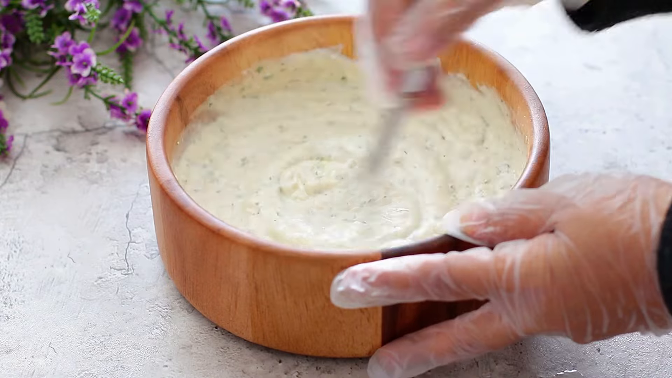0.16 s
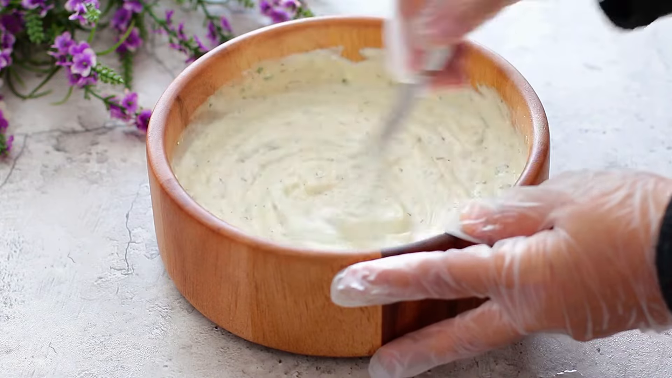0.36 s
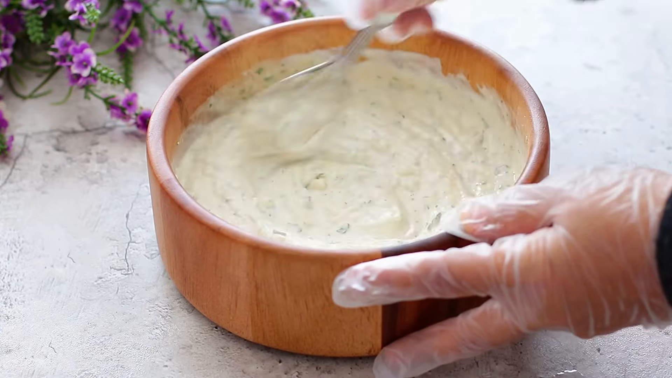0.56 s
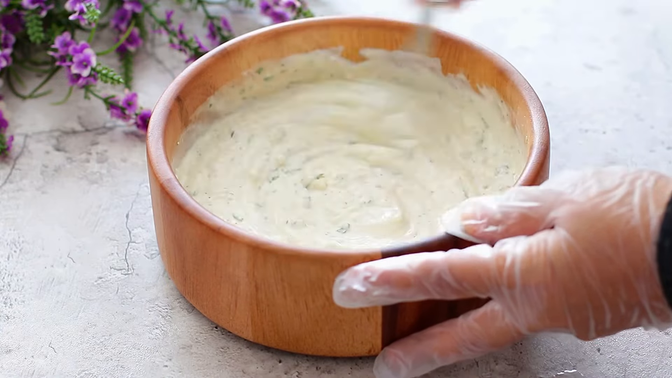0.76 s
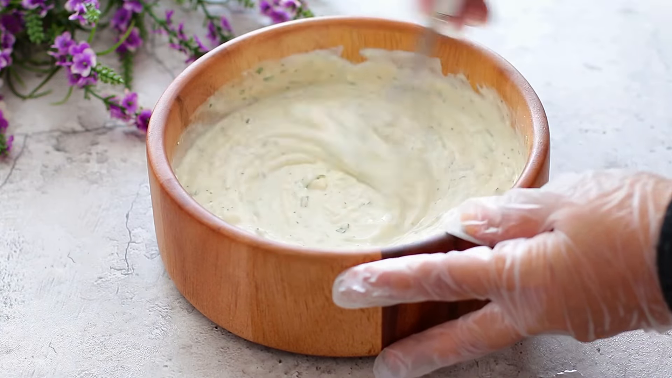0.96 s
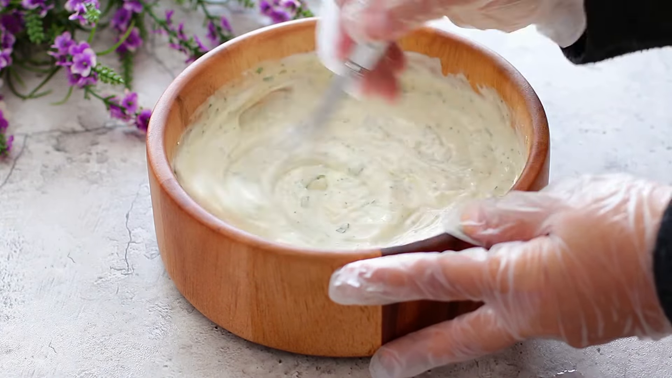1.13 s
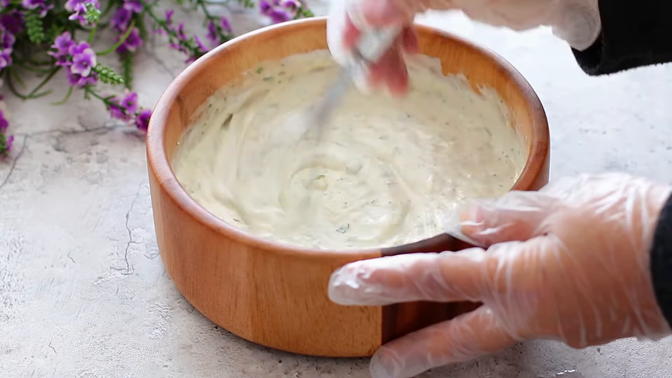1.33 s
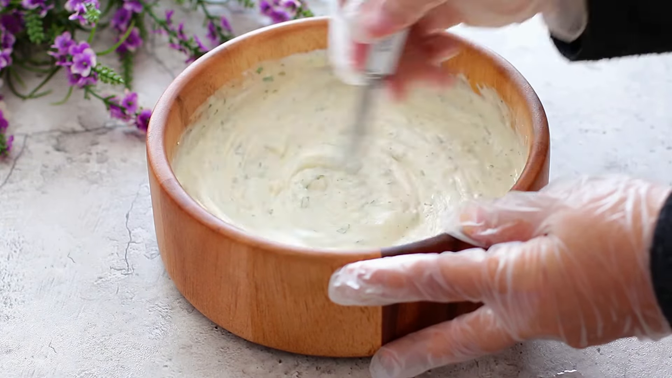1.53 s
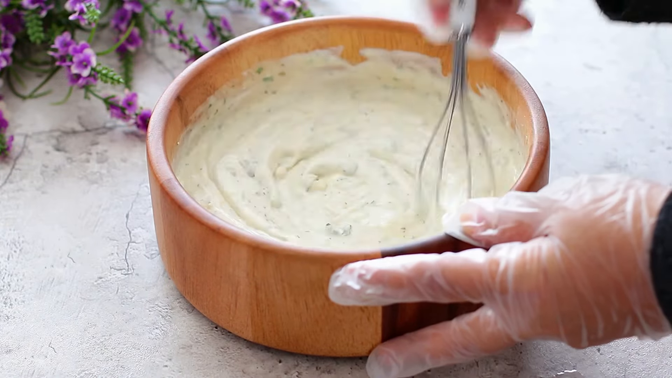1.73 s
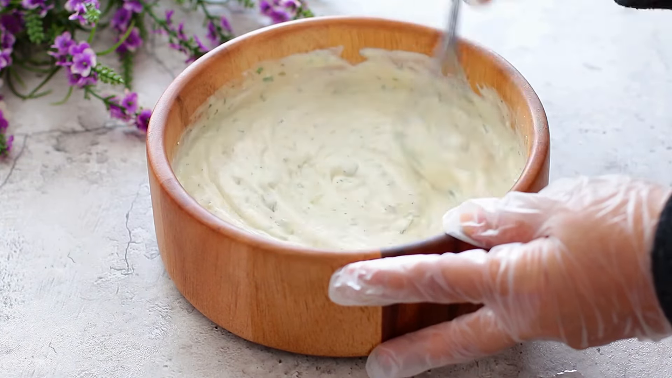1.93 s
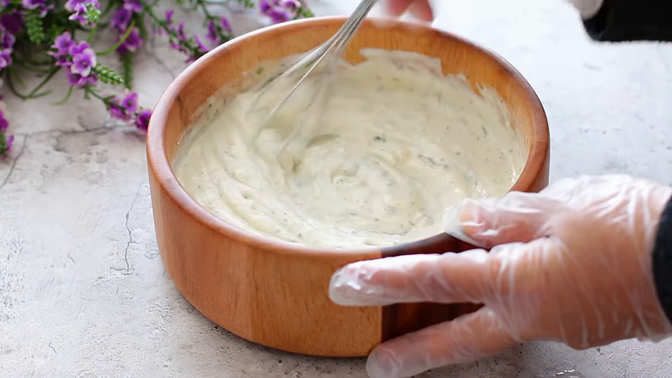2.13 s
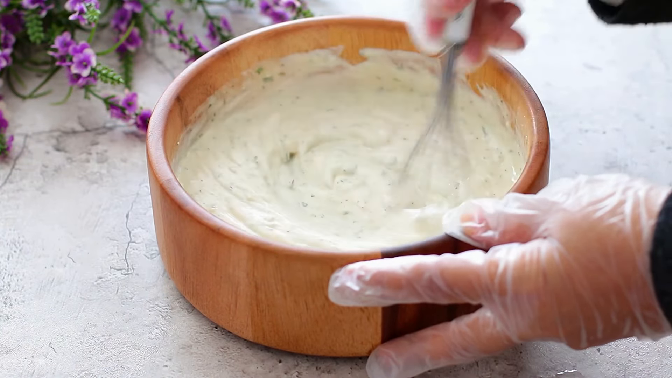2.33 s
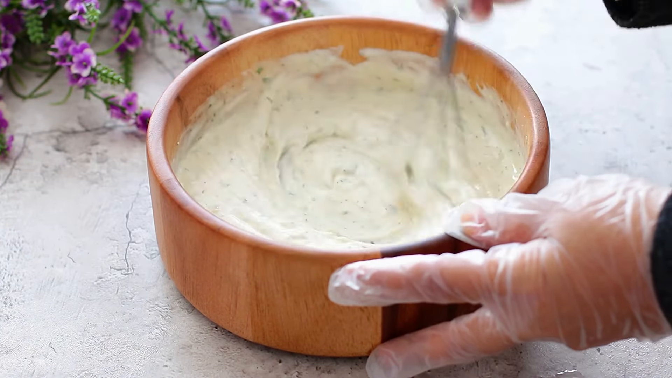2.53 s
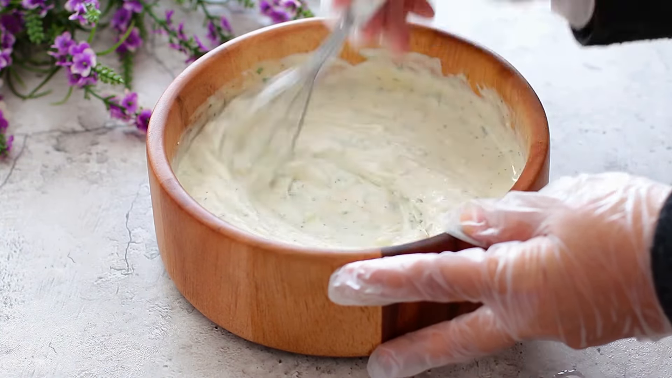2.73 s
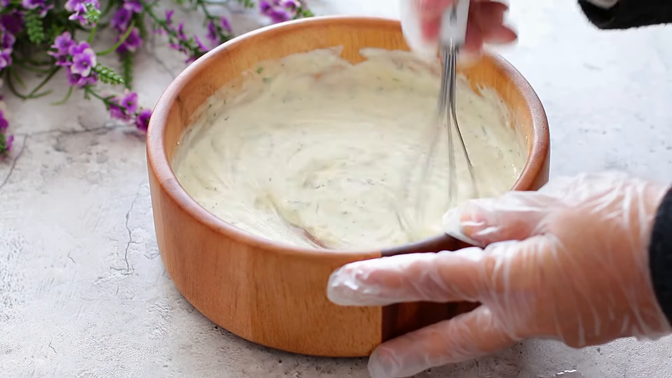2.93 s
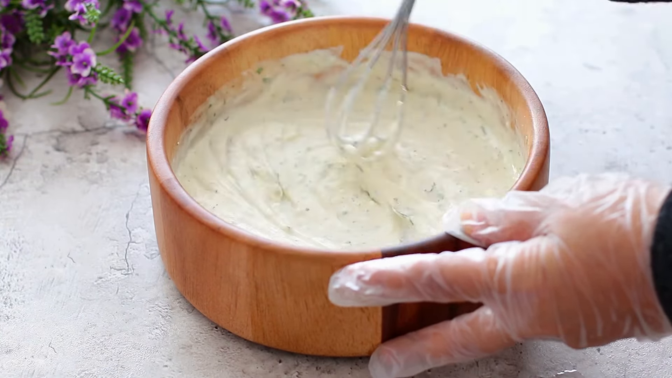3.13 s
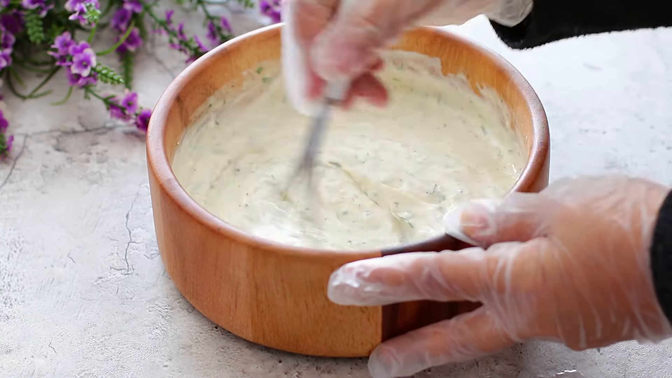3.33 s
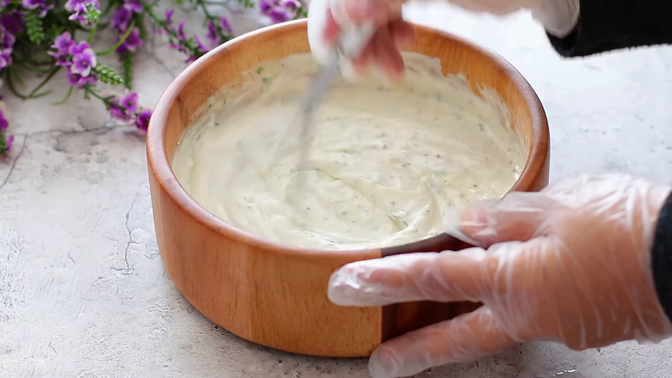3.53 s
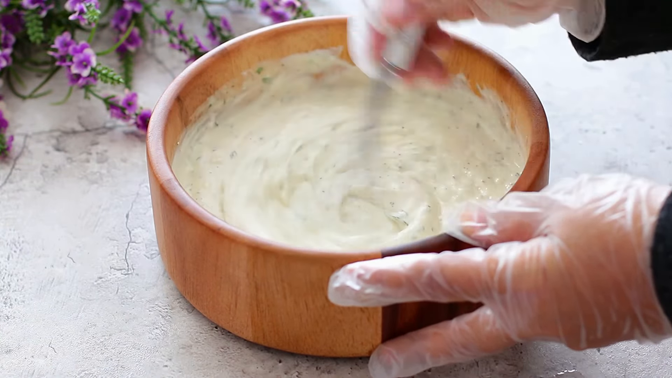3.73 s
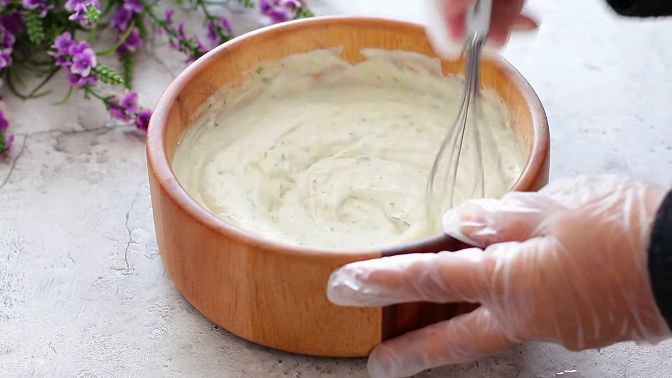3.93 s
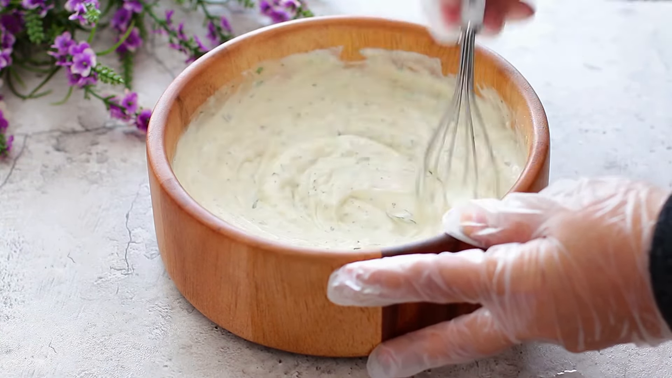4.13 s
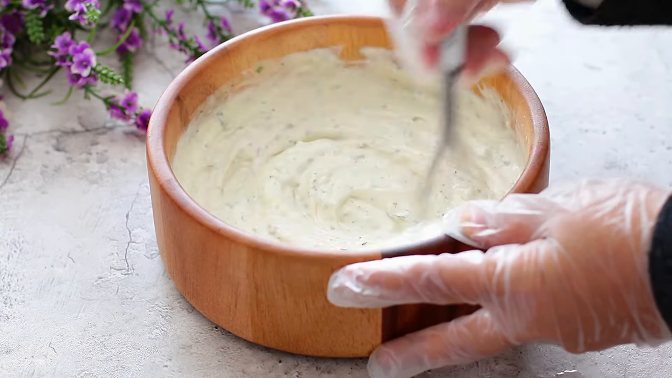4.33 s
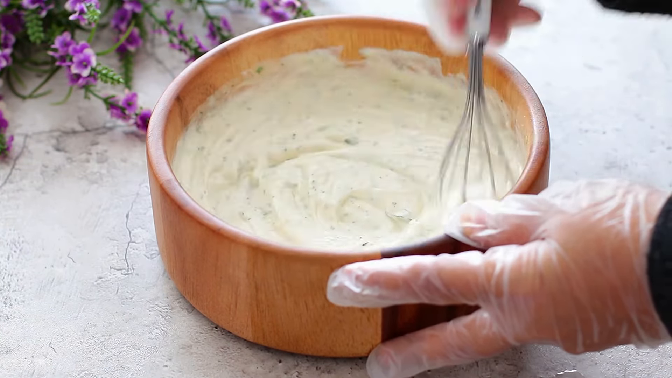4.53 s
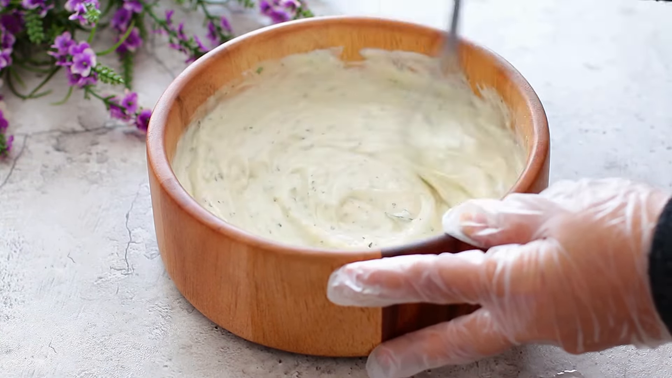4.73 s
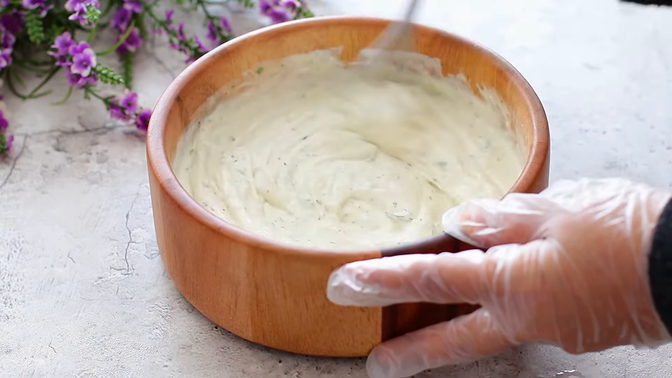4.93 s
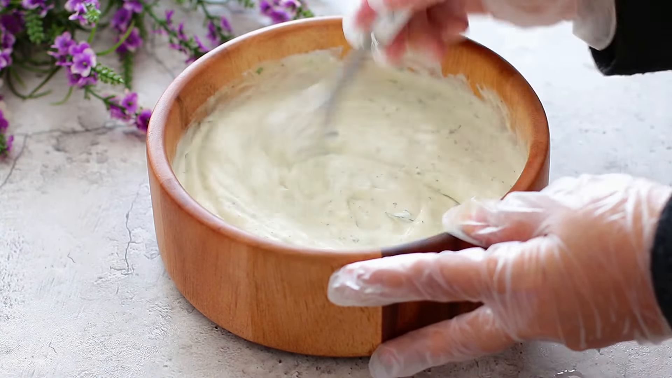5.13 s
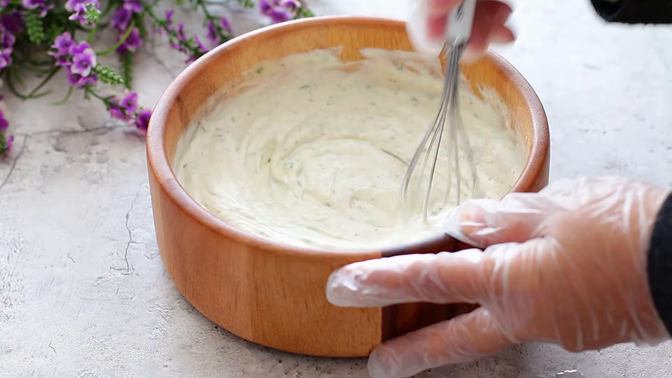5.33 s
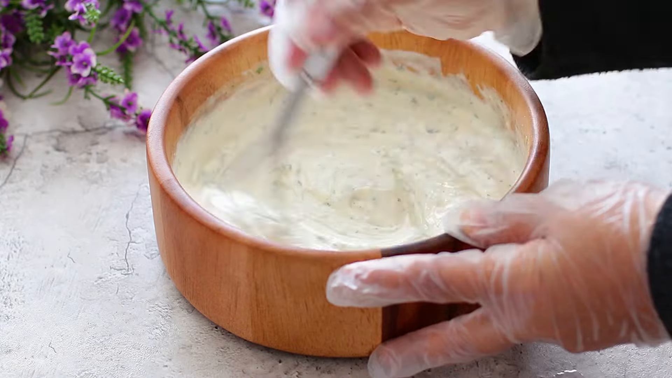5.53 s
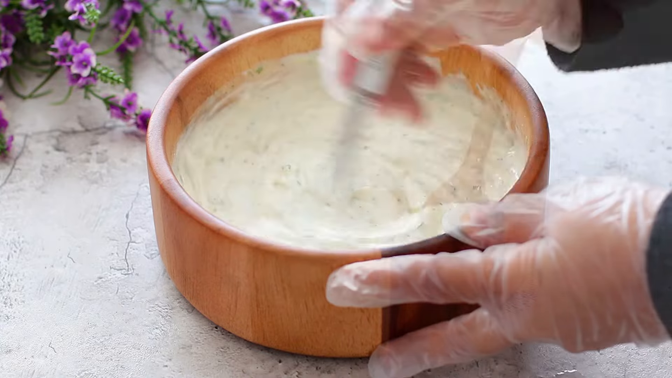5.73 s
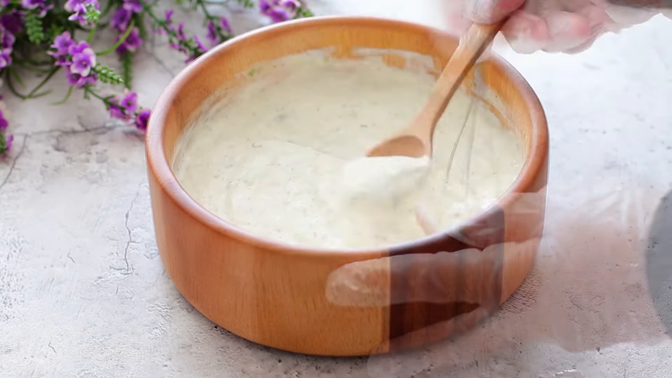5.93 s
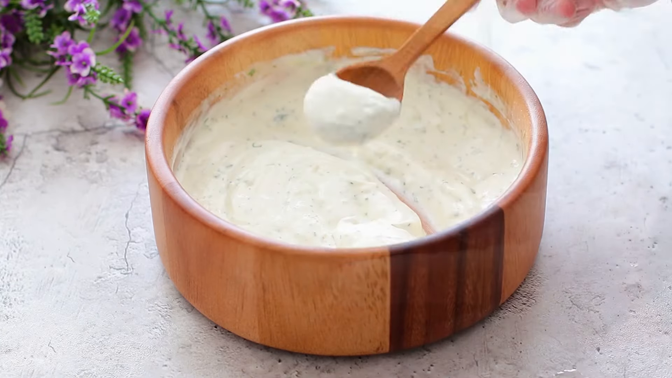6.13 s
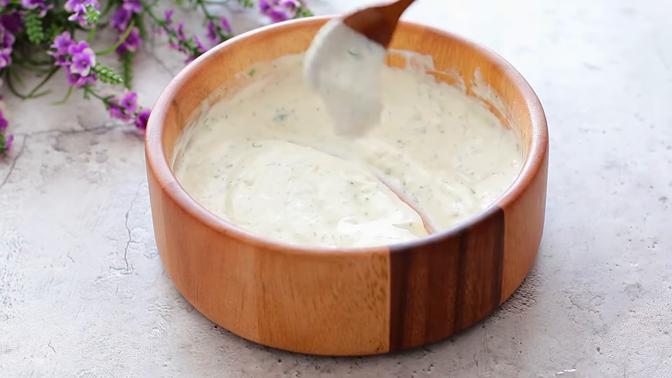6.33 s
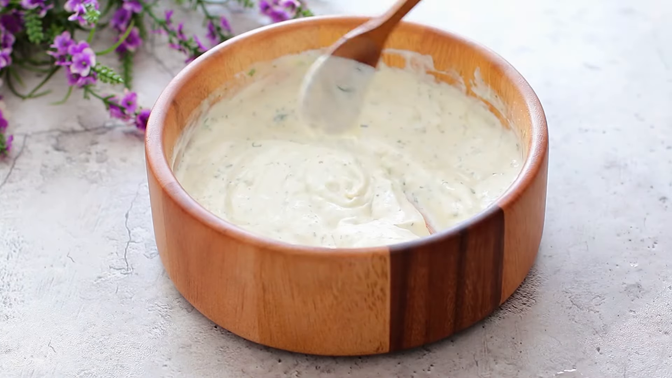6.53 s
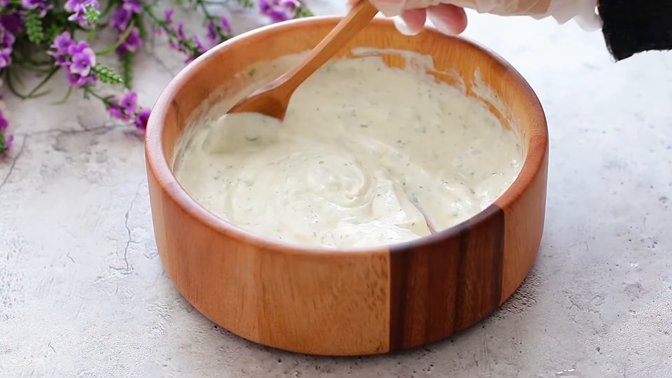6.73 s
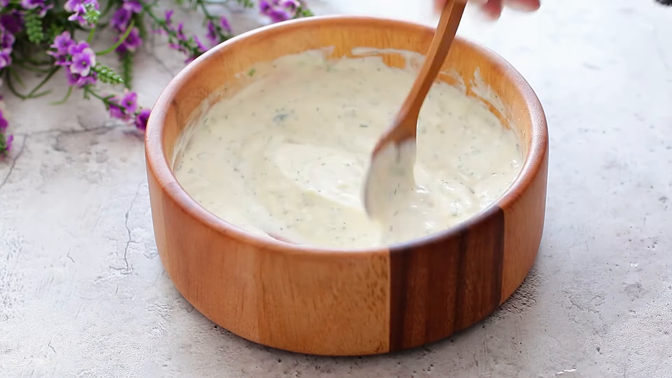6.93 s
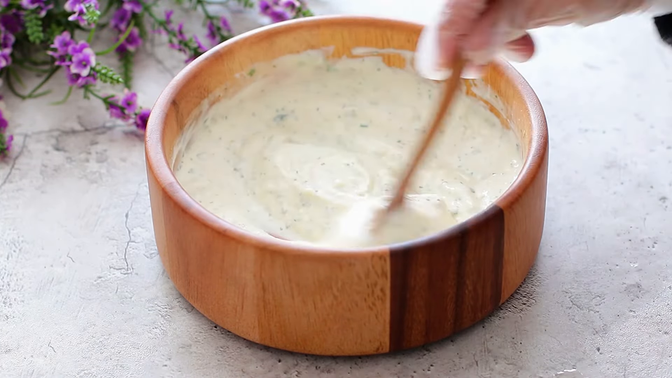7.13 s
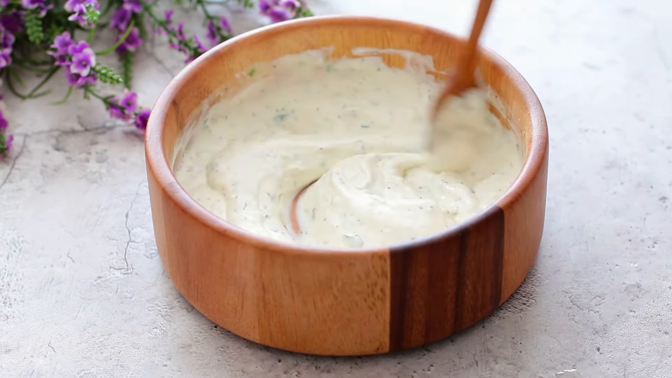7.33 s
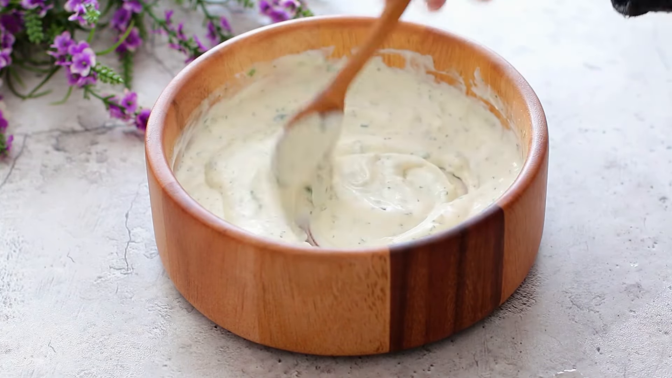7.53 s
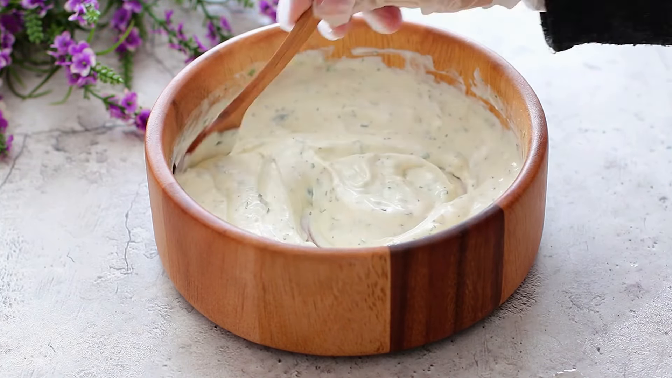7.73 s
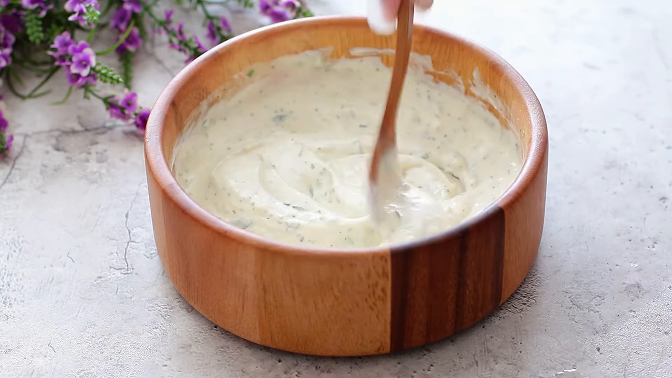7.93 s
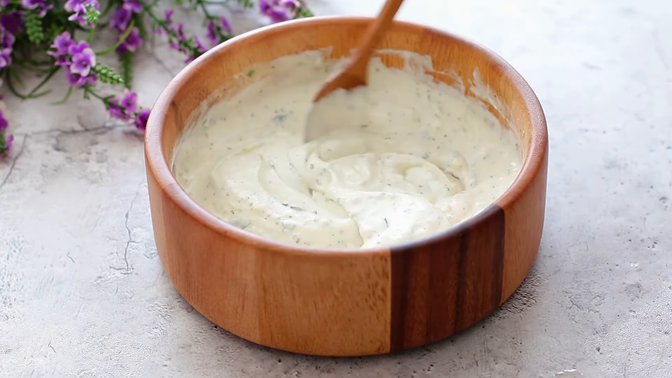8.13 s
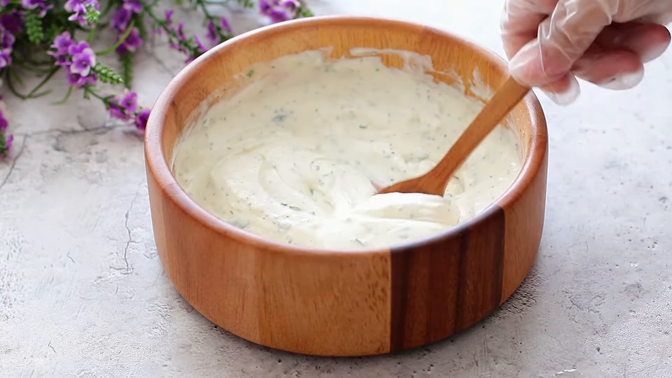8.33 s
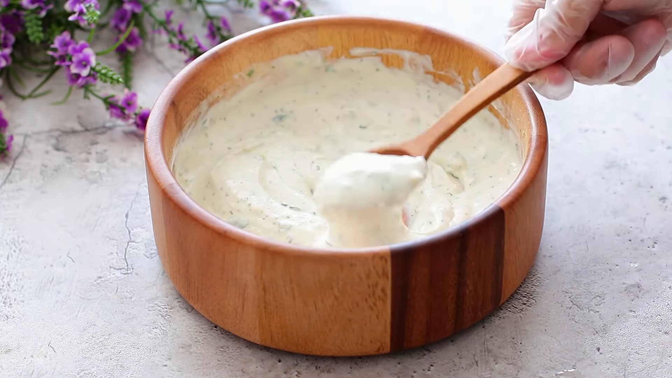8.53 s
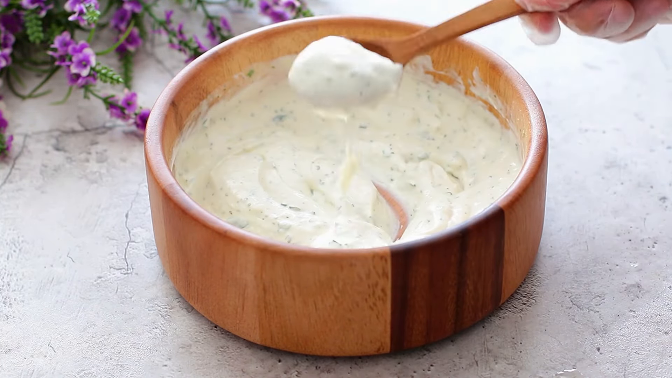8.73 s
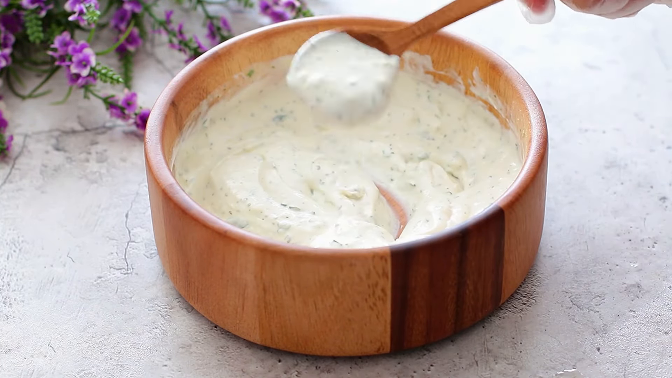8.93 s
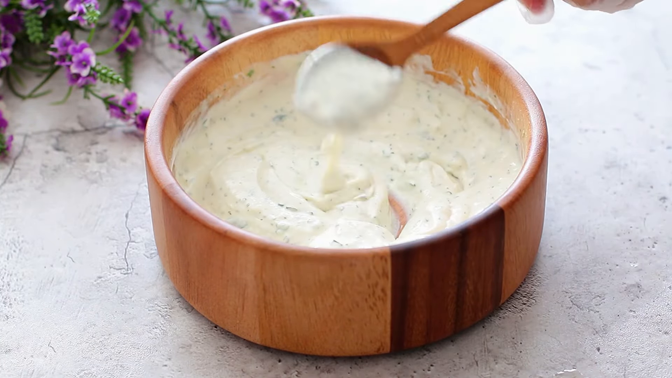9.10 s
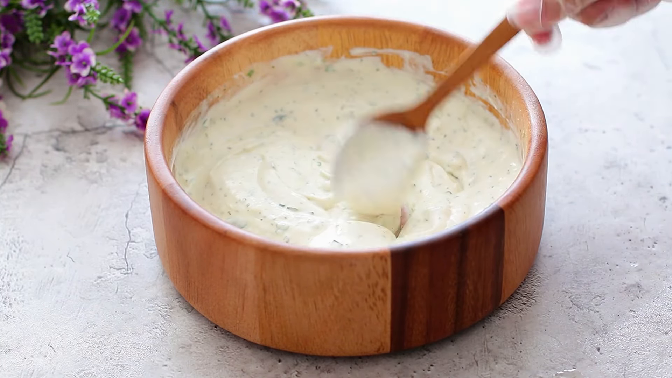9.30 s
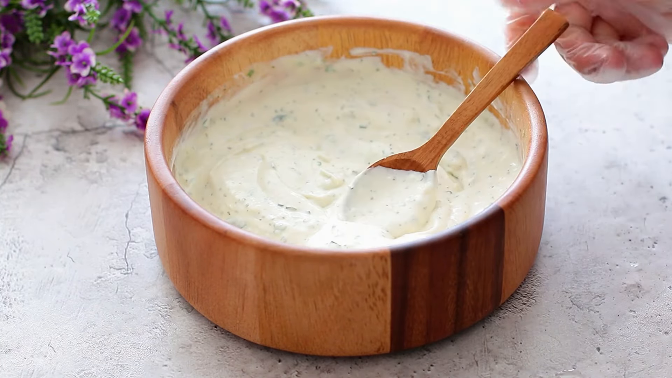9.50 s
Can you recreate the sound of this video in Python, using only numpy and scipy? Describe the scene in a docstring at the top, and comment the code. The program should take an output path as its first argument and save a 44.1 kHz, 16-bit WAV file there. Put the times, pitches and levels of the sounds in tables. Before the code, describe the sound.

Close by in a quiet kitchen, a wire whisk beats thick creamy sauce in a wooden bowl: light wet swishes grow into firm, scratchy strokes, with tiny pauses, bubbles and ticks on the wall. After about six seconds it stops. A wooden spoon stirs softly with dull knocks and short rubs, then a faint double tap lands on the rim over still air.

```python
"""Whisk and spoon in a wooden bowl

A wire whisk beats thick sauce, then a wooden spoon stirs and lifts it, close by in a quiet kitchen.
Whisk: random slips through wire resonances (rasp on the wall), coloured grit, bubbles and clicks (cream).
Sauce: low heaving noise and rising plops. Spoon: rubbed-wood noise, cracks and decaying bowl modes.
Behind them: sparse room reflections, still air and a faint appliance hum made of sines.
"""
import sys
import numpy as np
from scipy import signal
from scipy.fft import rfft, irfft, next_fast_len
from scipy.io import wavfile
from scipy.ndimage import uniform_filter1d, map_coordinates

SR = 44100
rng = np.random.default_rng(int(sys.argv[2]) if len(sys.argv) > 2 else 0)


def to_wav(sig):
    """Store sig (one row per channel, or 1-D mono) as 16-bit WAV at the path in sys.argv[1].

    Samples outside -1..1 are clipped; the rate is SR.
    """
    pcm = np.clip(np.atleast_2d(sig), -1, 1) * 32767
    pcm = np.round(pcm).astype(np.int16)
    wavfile.write(sys.argv[1], SR, pcm.T)  # frames by channels


N = 421596
LONG = next_fast_len(N, True)

# Wire loops pressed on the wall: centre_hz (at pitch factor 1), half_width_hz, gain_db
WIRES = [(605, 37, -10.5), (860, 23, -14), (1574, 149, -3.5), (1991, 130, -0.5), (3896, 322, 1.7),
         (5856, 240, -1.5), (6660, 170, -3.5), (8310, 690, -7), (11100, 3100, -17.5)]
# Wall strokes: peak_s, level_db, pitch_factor, rise_s (per 20 dB; negative: rise and fall slopes trade places)
STROKES = [(.002, -41, 1.19, 0.08), (0.094, -41, 0.98, 0.1), (.302, -42.5, 0.94, 0.13),
           (.368, -39, 1.18, -0.13), (0.448, -39, 1.02, -0.08), (0.599, -36, 0.98, .06),
           (.675, -38, 1.07, 0.05), (.772, -39, 1, 0.05), (.952, -39.5, 0.99, .075),
           (1.019, -39, 1.09, -0.05), (1.153, -37.5, 0.92, 0.02), (1.195, -40, 0.98, 0.13),
           (1.397, -35, 0.97, 0.04), (1.587, -35.5, 0.94, 0.09), (1.759, -30, 0.99, 0.05),
           (1.922, -29.5, 0.98, 0.0453), (2.081, -29.5, 0.98, 0.07), (2.23, -31, 0.97, 0.08),
           (2.378, -29, 1.005, 0.02), (2.522, -28, 1.01, 0.0447), (2.678, -30, 1.005, 0.055),
           (2.821, -26, 0.98, 0.05), (2.965, -29.5, 1, 0.07), (3.091, -29, 1.01, 0.04),
           (3.389, -34.5, 0.89, 0.02), (3.617, -35.5, 0.98, 0.03), (3.785, -33.5, 0.98, 0.09),
           (3.953, -31, 0.98, 0.09), (4.387, -41.5, 0.87, 0.2), (4.712, -34, .96, 0.07),
           (4.882, -28.5, .97, 0.06), (5.043, -30.5, 0.97, 0.04), (5.207, -28, 1.01, 0.0641),
           (5.356, -30.5, 0.98, 0.0646), (5.784, -35, 0.92, 0.06), (5.958, -34.5, 0.99, 0.03),
           (6.132, -45, 0.95, 0.14), (6.265, -61, 1.2, 0.3)]
# Light swishes of the loops through the cream: peak_s, level_db, pitch_factor
SWISHES = [(0.191, -43, 1.33), (0.268, -44.5, 1), (0.525, -39.5, 1.39), (0.82, -48.5, 1.0),
           (0.89, -45.5, 1.23), (1.256, -45.5, 1.5), (1.352, -42, 0.92), (1.465, -44.5, 1.3),
           (1.547, -40, 1.05), (1.635, -48, 1.34), (1.82, -47.5, 1.36), (2.29, -47, 1.35),
           (2.428, -44.5, 1.25), (2.6, -45.5, 1.4), (2.735, -46.5, 0.85), (2.865, -46.5, 1.0),
           (2.916, -41, 1.47), (3.02, -48, 1.23), (3.477, -42.5, 1.19), (3.667, -42, 1.44),
           (3.735, -44.5, 1.23), (3.827, -39.5, 1.2), (3.997, -44.5, 1.35), (4.132, -45.5, 0.9),
           (4.187, -43.5, 1.36), (4.237, -46.5, 1.39), (4.338, -49, 1.09), (4.46, -43, 1.2),
           (4.513, -43, 0.91), (4.55, -42.5, 0.85), (4.592, -43, 1.35), (4.647, -42.5, 1.39),
           (4.766, -39.5, 1.37), (4.825, -42.5, 1.14), (4.927, -40.5, 1.05), (4.972, -41.5, 1.1),
           (5.084, -37.5, 0.77), (5.142, -43, 1.26), (5.26, -44.5, 1.3), (5.32, -46, 1.1),
           (5.585, -45, 0.95), (5.667, -44.5, 1.3), (5.832, -43.5, 1), (5.9, -45.5, 1.47), (6, -46.5, 1.55),
           (6.228, -52, 1.39), (6.306, -51.5, 1)]
# Spells of beating: start_s, end_s, wash_level_db
SPELLS = [(0, 1.046, -55), (1.116, 1.638, -50.5), (1.65, 3.137, -53), (3.247, 4.125, -53),
          (4.086, 5.423, -51.5), (5.43, 6.028, -55.5)]
# The hand stops dead: start_s, end_s
HALTS = [(0.375, 0.42), (1.024, 1.14), (3.111, 3.241), (3.4, 3.48)]
# The loops clear the cream for an instant: centre_s
LIFTS = [.232, .497, .562, .912, 1.238, 1.492, 2.162, 2.632, 3.872, 4.158, 5.47, 6.208]
# Colour of tearing cream: freq_hz, density_db_per_hz
SQUELCH = [(60, -48), (150, -15), (280, -17), (430, -8.5), (680, -8.5), (860, 0.5), (1130, -6.5),
           (1300, -4.5), (1600, -16), (2350, 6.5), (2900, 4), (3500, 0.5), (4200, 1.5), (5000, -1),
           (6200, 2), (8300, 3), (11000, -4), (14000, -11.5), (16000, -36)]
# Colour of sauce folding over: freq_hz, density_db_per_hz
BURBLE = [(100, -24), (250, -13.5), (430, 1), (680, -7), (860, -0.5), (1130, -6.5), (2500, -26)]
# The whisk, bent against the bottom, grinds on wood: start_s, length_s, level_db, swell_db (over the stroke)
GRINDS = [(3.273, .02, -44.5, -8), (3.317, .007, -40, 0), (3.331, 0.069, -35, 2.5), (4.078, 0.018, -40, -3),
          (4.28, .018, -37, 1), (5.505, 0.039, -42.5, -4), (5.611, 0.0087, -40.5, -1),
          (6.251, .016, -50.5, -1)]
# Bent wires: centre_hz, half_width_hz, gain_db
BENT_WIRES = [(840, 130, -15), (1570, 105, 1.5), (1830, 150, -4), (3300, 210, -5.5), (4570, 150, -3.5),
              (5420, 260, -11.5), (7400, 600, -13), (8600, 2900, -20.5)]
# The whisk hits the bowl: start_s, relative_level_db, rattle_s (to fall 20 dB), pitch_factor
TICKS = [(0.141, -36, 0.04, 0.77), (0.406, -36.5, 0.0096, 1.13), (.746, -33.5, 0.029, 1.02),
         (1.113, -39, 0.0085, 0.75), (1.132, -36, 0.0086, 0.91), (1.326, -41.5, 0.027, 0.7),
         (1.511, -37, 0.028, 0.76), (1.902, -31, 0.015, 1.06), (2.0203, -34.5, 0.022, 1.12),
         (2.4643, -15, 0.0047, 1.07), (2.4675, -23, 0.0065, 1.02), (2.789, -36.5, 0.03, 1.1),
         (2.953, -27, 0.02, 1.11), (3.061, -35, 0.023, 0.96), (3.242, -28.5, 0.0063, 1.3),
         (3.273, -24, 0.0076, 0.83), (3.471, -42, 0.023, 1.2), (4.046, -31, 0.021, 1),
         (4.2655, -27, 0.0097, 1.37), (4.269, -22.5, 0.0075, 1.23), (5.294, -29, 0.014, 0.95),
         (5.502, -24, 0.01, 1.23), (5.6113, -32.5, 0.015, 0.74), (5.74, -34.5, 0.021, 1.04),
         (6.143, -38, 0.01, 0.79)]
# The mass of sauce slumps: peak_s, relative_level_db
HEAVES = [(.21, -54.5), (.415, -55.5), (.55, -56.5), (.71, -52.5), (.91, -56), (2.85, -62.5), (2.94, -60.5),
          (3.33, -54), (5.56, -57), (5.7, -58)]
# Colour of the heaving sauce: freq_hz, density_db_per_hz
HEAVE_COLOUR = [(40, -40), (85, -31), (125, -5.5), (180, 2), (270, -6.5), (430, -1.5), (700, -15),
                (2000, -60)]
# Closing air pockets and dull bumps: start_s, level_db, start_hz, t60_s
PLOPS = [(.407, -29.5, 366, 0.024), (0.41, -52, 194, 0.076), (0.55, -44.5, 306, 0.048),
         (0.704, -48.5, 308, 0.08), (.902, -38, 332, 0.027), (1.114, -39.5, 430, 0.036),
         (3.244, -43, 201, 0.035), (3.315, -44.5, 168.5, 0.11), (5.55, -48.5, 160.4, 0.14),
         (6.752, -55, 97.5, 0.14), (7.156, -57, 108, 0.13), (7.728, -52.5, 94, 0.14),
         (8.13, -47, 117, 0.078)]
# The spoon rubs the bowl: start_s, length_s, level_db, swell_db (over the stroke), bright_db (per octave),
# hollow_from_hz, hollow_to_hz, hollow_width_hz
DRAGS = [(6.844, .065, -44.5, 7.5, 1.5, 850, 1350, 600), (7.259, .24, -50.5, -4.5, -0.1, 1400, 420, 460),
         (7.503, 0.035, -45, 3, 1, 1760, 1800, 200), (7.724, 0.081, -52.5, -11, -1.5, 800, 680, 600),
         (7.887, 0.054, -44.5, 1, -1, 1150, 1080, 600), (8.126, 0.028, -46.5, -9, 0, 2420, 1950, 800),
         (8.165, 0.053, -51, -2, -2.5, 780, 1300, 300), (8.204, .19, -57, -20, 0.3, 1104, 1130, 110)]
# Colour of wood on wood: freq_hz, density_db_per_hz
WOOD = [(60, -18), (170, -20), (350, -7), (480, -7.5), (610, -3.5), (790, -4.5), (1130, 0.5), (1380, -6.5),
        (1750, -2), (2200, -5), (3000, -4.5), (3600, -7), (5200, -8), (9000, -21), (16000, -42)]
# The rubbed bowl sings: centre_hz, half_width_hz, lift_db
SINGING = [(622, 32, 6.5), (1116, 50, 6.5), (1850, 50, 3), (3100, 49, 2)]
# The spoon meets the bowl under the sauce: start_s, relative_level_db, muffled_above_hz, mode_factor
KNOCKS = [(6.7508, -21, 484, 0.57), (7.1528, -28.5, 620, .6), (7.2618, -29.5, 2000, 1.06),
          (7.7246, -18, 2140, 0.84), (8.129, -16, 2840, 0.998), (7.889, -36, 1996, 1),
          (8.168, -32, 2000, .8)]
# Modes of bowl and spoon: freq_hz (at factor 1), level_db, t60_s
BOWL_MODES = [(380, -29, 0.025), (663, -15, 0.032), (810, -17.5, 0.031), (1113, -1.5, 0.016),
              (1109, -24.5, 0.18), (1565, -7.5, 0.017), (1860, -1, 0.014), (2200, -7.5, 0.016),
              (2890, 0.5, 0.012), (3530, -18, 0.014), (4670, 5.5, 0.0059), (5620, 4.5, 0.0066),
              (9200, 2.5, 0.0054)]
# The lifted spoon ticks: start_s, relative_level_db, muffled_above_hz, mode_factor
SPOON_TICKS = [(9.139, -49.5, 6000, 1.01), (9.3228, -60, 6000, 1.3)]
# Modes of the spoon alone: freq_hz (at factor 1), level_db, t60_s
SPOON_MODES = [(1095, -4, 0.058), (1830, 4, .014), (3090, 5, .014), (4050, -1, 0.022)]
# The handle lands on the rim and bounces: start_s, relative_level_db, muffled_above_hz, mode_factor
RIM_TAPS = [(9.5088, -31, 6000, 1), (9.517, -31, 3500, 1)]
# Modes of the bare rim: freq_hz (at factor 1), level_db, t60_s
RIM_MODES = [(370, -22, 0.057), (607, -17, 0.1), (1240, -3, 0.045), (1580, -4.5, 0.016), (1870, -5, .035),
             (2720, -13, 0.018), (3460, -3.5, 0.016), (4030, -8, .016), (5250, -8, 0.017)]
# Room decay: freq_hz, t60_s
KITCHEN_T60 = [(100, 0.4), (1000, 0.39), (4000, 0.38), (14000, 0.089)]
# Partials of the appliance hum: freq_hz, level_db
HUM = [(71.5, -89), (145.3, -75.5), (215.3, -81), (285.3, -80.5), (640.6, -81.5), (850.6, -84.5)]
# The hum grows: time_s, gain_db
HUM_GAIN = [(5.8, -13), (6.3, 0)]
# Colour of still air: freq_hz, density_db_per_hz
AIR = [(20, 4), (50, -5), (110, 0.5), (160, -0.5), (260, -1), (450, -3.5), (700, -6.5), (1000, -9),
       (1800, -11), (3300, -9.5), (8000, -12.5), (16000, -14.5)]
# Likeness of the microphone ports: freq_hz, likeness (0..1)
SAME = [(40, .2), (140, .8), (300, .45), (1300, .72), (3000, .48), (15000, .38)]
# Phase between the ports: freq_hz, left_lead_rad
LEAD = [(150, 0.067), (400, -1.34), (690, 1.91), (1210, 0.36), (2000, 1.52), (3800, 1.32), (5800, 1.41),
        (8000, 1.72), (14000, 1.13)]
# Balance of the ports: freq_hz, left_minus_right_db
BALANCE = [(60, -7), (110, 5), (200, -6.5), (380, 8), (700, 3.5), (1290, 1.5), (2380, 3), (4400, 1),
           (8120, 2.5), (15000, 1.5)]

FALL_SHARE = 0.82  # stroke fall_s / rise_s
FIRM_DB = -42.5  # strokes above this are mostly wire rasp, those below mostly cream
BITE_S, BITE_DB, BITE_FROM_DB = .008, 2.5, -31  # peak bite: half length, extra level, stroke level of onset
SWISH_RISE_S, SWISH_FALL_S = 0.05, 0.038  # per 20 dB
SWISH_RASP, WASH_RASP, WASH_PITCH = 0.32, 0.076, 1.17  # rasp share of swish and wash; wash pitch factor
HALT_S, HALT_DB = 0.024, -13  # time to stop; drop
LIFT_S, LIFT_DB = .016, -5.5  # half length at half the dB drop; drop
GRIND_ATTACK_S, GRIND_RELEASE_S = 0.0038, 0.015  # to full pressure; to fall 20 dB
HEAVE_RISE_S, HEAVE_FALL_S, CHURN_DB = 0.12, 0.11, -66.5  # per 20 dB; churn level relative as in HEAVES
DRAG_ATTACK_S, DRAG_RELEASE_S = 0.0057, 0.027  # to full pressure; to fall 20 dB
CRACK_S, CRACK_DB = 0.0065, -6.5  # to fall 20 dB; level relative to the blow
AIR_DB = -66.5
EDGE_HZ = 15950


def whisk(sink=0.048, rasp_db=0.0, wet_db=-1.5, scratch=0.097, judder_db=1.5, waver=0.02, clump_db=1.2):
    """Swishes mostly part the cream; strokes reach the wood and make the wires rasp."""
    size = next_fast_len(round(6.5 * SR), True)
    power, contact, pitch = whisk_motion(size, sink, waver)
    judder = random_gain(size, judder_db, 300)
    slips = grit(per_s=3000, spread_db=0.5, smooth=1.0, size=size) * judder
    rasp = evened(wires(slips, pitch)) + scratch * colour(slips, SQUELCH)
    rasp = cavities(rasp, depth_db=4.0, span_hz=430, life_s=.018)
    tearing = grit(per_s=1800, spread_db=1.0, smooth=0.66, size=size) * judder
    tearing = tearing * random_gain(size, clump_db, 450)
    cream = colour(cavities(tearing, depth_db=7.5, span_hz=340, life_s=.036), SQUELCH)
    wet = power * (1 - contact)
    sound = amp(rasp_db) * np.sqrt(power * contact) * rasp
    sound = sound + amp(wet_db) * np.sqrt(wet) * cream
    sound = sound + bubbles(wet) + crackle(wet) + burble(power)
    return np.pad(sound, [(0, 0), (0, N - size)])


def whisk_motion(size, sink, waver):
    """Power, rasp share and power-weighted pitch factor of the whisk, sample by sample."""
    t = np.arange(size) / SR
    power, pitch = np.full(size, 1e-14), np.full(size, 1e-14)
    for start, end, db in SPELLS:
        wash = amp(db) ** 2 * ((t > start) & (t < end))
        power += wash
        pitch += wash * WASH_PITCH
    contact = WASH_RASP * power
    for s, db, rise, fall, factor, share in sweeps():
        near = slice(max(int((s - .3) * SR), 0), int((s + .3) * SR))
        lag = t[near] - s
        bite_db = BITE_DB * np.exp(-(lag / BITE_S) ** 2) / (1 + amp(BITE_FROM_DB - db) ** 4)
        sweep = amp(db + bite_db - 20 * np.maximum(-lag / rise, lag / fall)) ** 2
        power[near] += sweep
        contact[near] += sweep * share
        pitch[near] += sweep * factor * (1 - sink * np.tanh(lag / 0.023))  # tone sinks as the loops bend
    pitch *= (1 + waver * evened(uniform_filter1d(rng.standard_normal(size), size=900))) / power
    contact = np.clip(contact / power, 0, 1)
    for start, end in HALTS:
        stopped = np.clip(np.minimum((t - start) / HALT_S, (end - t) * SR), 0, 1)
        power *= amp(HALT_DB * stopped) ** 2
    lifted = sum(np.maximum(1 - ((t - s) / LIFT_S) ** 2 / 2, 0) for s in LIFTS)
    power *= amp(LIFT_DB * lifted) ** 2
    return abs(uniform_filter1d(power, size=300)), contact, pitch


def sweeps():
    """Strokes and swishes: peak_s, level_db, rise_s, fall_s, pitch_factor, rasp_share."""
    strokes = [(s, db, rise, FALL_SHARE * rise, pitch, 1 / (1 + amp(FIRM_DB - db) ** 2))
               for s, db, pitch, rise in STROKES]
    swishes = [(s, db, SWISH_RISE_S, SWISH_FALL_S, pitch, SWISH_RASP) for s, db, pitch in SWISHES]
    return strokes + swishes


def wires(x, pitch, stiff_hz=3000):
    """The damped resonances of the wire loops; the high ones follow the pitch factor most."""
    hz, t, z = signal.stft(x, SR, nperseg=512, noverlap=384)
    factor = np.interp(t * SR, np.arange(x.shape[-1]), pitch * np.ones(x.shape[-1]))
    unbent_hz = hz[:, None] / factor ** np.minimum(hz[:, None] / stiff_hz, 1)
    gain = np.interp(unbent_hz, hz, humps(WIRES, hz))
    return signal.istft(z * gain, SR, nperseg=512, noverlap=384)[1][:, :x.shape[-1]]


def bubbles(power, per_s=70, level_db=-10, spread_db=3.5, cycles=14, climb=0.131):
    """Tiny bubbles burst at random, each a short rising blip as loud as the tearing cream allows."""
    out, t = np.zeros((2, len(power))), np.arange(1200) / SR
    for at, tone, size, side in rng.random((round(per_s * len(power) / SR), 4)):
        hz, start = 1700 * 5 ** tone, int(at * len(power))
        age = t * hz / cycles
        blip = np.sin(2 * np.pi * hz * t * (1 + climb * np.tanh(age / 4)))
        blip *= np.exp(-age) * (1 - np.exp(-8 * age))
        loud = amp(level_db + spread_db * min(-np.log(1 - size), 3)) * np.sqrt(power[start])
        add(out, start / SR, 2 * loud * np.sqrt([[side], [1 - side]]) * blip)
    return out


def crackle(power, per_s=110, level_db=-14, spread_db=1.5):
    """Threads of cream snap off the wires in tiny separate clicks."""
    snaps = grit(per_s=per_s, spread_db=spread_db, smooth=0, size=len(power))
    return amp(level_db) * np.sqrt(power) * colour(snaps, SQUELCH)


def burble(power, level_db=-63.0, busy_db=-50):
    """Sauce folds over while the whisk moves; the level saturates however hard it is pressed."""
    motion = abs(uniform_filter1d(power, size=2200))
    folds = grit(per_s=260, spread_db=3.5, smooth=0.57, size=len(power))
    folds = colour(cavities(folds, depth_db=6.0, span_hz=180, life_s=.022), BURBLE)
    return amp(level_db) * motion / (motion + amp(busy_db) ** 2) * folds


def grinds(level_db=0, scratch=0.28, judder_db=1.5):
    """Bent wires stick and slip on the bottom and sound in a few separate bands."""
    out, t = np.zeros((2, N)), np.arange(8192) / SR
    for s, length, db, swell_db in GRINDS:
        slips = ports(rng.standard_normal((2, len(t)))) * random_gain(len(t), judder_db, 200)
        rasp = evened(irfft(rfft(slips) * humps(BENT_WIRES, bins(slips)))) + scratch * colour(slips, SQUELCH)
        rasp = cavities(rasp, depth_db=4.5, span_hz=350, life_s=.012)
        swell = swell_db * (np.minimum(t / length, 1) - .5)
        swell = swell - 20 * np.maximum(t - length, 0) / GRIND_RELEASE_S
        add(out, s, amp(level_db + db + swell) * np.minimum(t / GRIND_ATTACK_S, 1) * rasp)
    return out


def ticks(crack=0.96, level_db=1):
    """The loops strike the wall and rattle against it for a moment."""
    out, t = np.zeros((2, N)), np.arange(4096) / SR
    for s, db, rattle, pitch in TICKS:
        blows = ports(rng.standard_normal((2, len(t))))
        ring = evened(evened(wires(blows, pitch)) + crack * colour(blows, SQUELCH))
        add(out, s, amp(level_db + db - 20 * t / rattle) * (1 - np.exp(-t / 0.00082)) * ring)
    return out


def sauce(heave_db=-1, climb=3.6):
    """The thick mass churns and slumps behind the whisk; air pockets close with a rising plop."""
    t = np.arange(N) / SR
    level = amp(CHURN_DB) * beating()
    for s, db in HEAVES:
        away = np.minimum(np.maximum((s - t) / HEAVE_RISE_S, (t - s) / HEAVE_FALL_S), 10)
        level = np.maximum(level, amp(db - 20 * away))
    out = amp(heave_db) * level * colour(grit(per_s=150, spread_db=2, smooth=0.48), HEAVE_COLOUR)
    t = np.arange(9000) / SR
    for s, db, hz, t60 in PLOPS:
        plop = np.sin(2 * np.pi * hz * t * (1 + climb * t))
        add(out, s, amp(db - 60 * t / t60) * (1 - np.exp(-t / 0.0021)) * plop)
    return out


def beating(ease_s=.01):
    """1 within a spell of beating, 0 at rest; overlapping spells add."""
    t = np.arange(N) / SR
    return sum(np.clip(np.minimum(t - start, end - t) / ease_s, 0, 1) for start, end, _ in SPELLS)


def spoon_drag(level_db=0, pivot_hz=1500, hollow=0.67):
    """Wood grain slips under the spoon; bowl and gliding hollow sing; the film of sauce sets the treble."""
    rub = cavities(grit(per_s=1200, spread_db=1.3, smooth=0.82), depth_db=2.5, span_hz=180, life_s=.03)
    rub = colour(rub, WOOD)
    sing_db = sum(db * np.exp(-((bins(rub) - hz) / width) ** 2) for hz, width, db in SINGING)
    rub = irfft(rfft(rub) * amp(sing_db), N)
    out, t = np.zeros((2, N)), np.arange(16384) / SR
    for s, length, db, swell_db, bright_db, from_hz, to_hz, width_hz in DRAGS:
        along = np.minimum(t / length, 1)
        wood = evened(rub[:, round(s * SR):][:, :len(t)])
        noise = ports(rng.standard_normal(wood.shape))
        cavity = resonate(noise, from_hz + (to_hz - from_hz) * along, width_hz / 2)
        wood = evened(wood + hollow * evened(cavity))
        treble = irfft(rfft(wood) * np.log2(np.clip(bins(wood), 500, 8000) / pivot_hz))
        press = amp(swell_db * (along - .5) - 20 * np.maximum(t - length, 0) / DRAG_RELEASE_S)
        press = press * np.minimum(t / DRAG_ATTACK_S, 1)
        add(out, s, amp(level_db + db) * press * (wood + (amp(bright_db) - 1) * treble))
    return out


def spoon_knocks():
    """The spoon knocks inside the bowl, ticks as it is lifted and lands on the rim."""
    inside = knocks(KNOCKS, BOWL_MODES, level_db=-4.5)
    lifted = knocks(SPOON_TICKS, SPOON_MODES, level_db=-3.5)
    return inside + lifted + knocks(RIM_TAPS, RIM_MODES, level_db=-3.5)


def knocks(blows, modes, level_db, low_hz=330):
    """Each blow cracks and rings the wood briefly, muffled above its own corner frequency."""
    out, t = np.zeros((2, N)), np.arange(6000) / SR
    for s, db, soft_hz, factor in blows:
        crack = amp(CRACK_DB - 20 * t / CRACK_S) * colour(ports(rng.standard_normal((2, len(t)))), WOOD)
        sound = signal.lfilter(*signal.butter(4, soft_hz, fs=SR), crack)
        for hz, mode_db, t60 in modes:
            phase = 2 * np.pi * (hz * factor * t + rng.random()) - np.array([[0], [read(LEAD, hz)]])
            muffle = np.sqrt(1 + (hz / soft_hz) ** 4)
            sound += amp(mode_db - 60 * t / t60) / muffle * np.sin(phase)
        add(out, s, amp(level_db + db) * (1 - np.exp(-t / 0.0005)) * sound)
    return signal.lfilter(*signal.butter(2, low_hz, "high", fs=SR), out)


def kitchen(x):
    """Sparse reflections, each band dying at its own speed."""
    taps = rng.choice([-1., 1.], (2, SR)) * (rng.random((2, SR)) < 4000 / SR)
    taps[:, :round(.005 * SR)] = 0
    hz, t, z = signal.stft(taps, SR, nperseg=256)
    tail = signal.istft(z * amp(-60 * t / read(KITCHEN_T60, hz)[:, None]), SR, nperseg=256)[1]
    return signal.fftconvolve(x, tail / np.linalg.norm(tail[0]), axes=1)[:, :N]


def background(air_db=0):
    """Still air as coloured noise; the appliance hum as steady sines under a growing gain."""
    t = np.arange(N) / SR
    hum = sum(np.sqrt(2) * amp(db) * np.sin(2 * np.pi * (hz * t + rng.random())) for hz, db in HUM)
    air = colour(ports(rng.standard_normal((2, LONG)))[:, :N], AIR)
    return amp(AIR_DB + air_db) * air + amp(follow(HUM_GAIN)[0]) * hum


def grit(per_s, spread_db, smooth, size=LONG):
    """Tiny slips of uneven size over a smooth hiss."""
    slip = (rng.random(size) < per_s / SR) * amp(spread_db * np.minimum(rng.exponential(1, size), 3))
    slips = evened(slip * rng.choice([-1., 1.], (2, size)))
    return ports(slips + smooth * rng.standard_normal((2, size)))[:, :N]


def cavities(x, depth_db, span_hz, life_s, glide_hz=140):
    """Short-lived hollows each favour a patch of frequencies, and glide as they stretch and shrink."""
    hz, t, z = signal.stft(x, SR, nperseg=512)
    field = rng.standard_normal(z.shape[1:])
    size = max(round(span_hz / hz[1]), 1), max(round(life_s / t[1]), 1)
    for _ in range(2):
        field = uniform_filter1d(uniform_filter1d(field, size[0], 0), size[1], 1)
    wander = uniform_filter1d(uniform_filter1d(rng.standard_normal(len(t)), size=14), size=14)
    drift = glide_hz * evened(wander)
    band, frame = np.indices(field.shape)
    band = band + np.tanh(hz[:, None] / 2500) * drift / hz[1]
    field = map_coordinates(field, [band, frame], order=1, mode="reflect")
    gain = amp(depth_db * np.clip(evened(field), -2, 2))
    gain /= np.sqrt(uniform_filter1d(gain ** 2, size=70, axis=0))  # keeps the broad spectrum level
    return evened(signal.istft(z * gain, nperseg=512)[1][:, :x.shape[-1]])


def resonate(x, hz, width):
    """A steep resonance of gain 1 that follows the curve hz."""
    angle = (2 * np.pi * (np.cumsum(hz * np.ones(x.shape[-1])) / SR % 1)).astype(np.float32)
    r = np.exp(-2 * np.pi * width / SR)
    return sum(2 * turn * signal.lfilter([(1 - r) ** 2], [1, -2 * r, r * r], x * turn)
               for turn in (np.cos(angle), np.sin(angle)))


def humps(resonances, hz):
    """The gain of a set of damped resonances."""
    return np.sqrt(sum(amp(db) ** 2 * np.exp(-((hz - centre) / width) ** 2)
                       for centre, width, db in resonances))


def random_gain(size, depth_db, smooth_samples):
    """A gain that wavers at random by depth_db RMS."""
    return amp(depth_db * evened(uniform_filter1d(rng.standard_normal(size), size=smooth_samples)))


def ports(x):
    """Two unrelated signals become a partly alike pair, shifted in phase."""
    hz, (a, b) = bins(x), rfft(x)
    same = np.clip(read(SAME, hz), 0, 1)
    right = (same * a + np.sqrt(1 - same ** 2) * b) * np.exp(-1j * read(LEAD, hz))
    return irfft(np.array([a, right]), x.shape[-1])


def colour(x, points):
    """Shape the spectrum by a table, then set RMS to 1."""
    order = next_fast_len(x.shape[-1], True)
    gain = amp(read(points, np.fft.rfftfreq(order, 1 / SR)))
    return evened(irfft(rfft(x, order) * gain, order)[:, :x.shape[-1]])


def amp(db):
    """Decibels to amplitude."""
    return 10 ** (np.asarray(db) / 20)


def evened(x):
    """Scale to RMS 1."""
    return x / np.sqrt(np.mean(x ** 2) + 1e-20)


def read(points, hz):
    """A table joined by straight lines over log frequency."""
    f, value = np.transpose(points)
    return np.interp(np.log(hz + 1), np.log(f + 1), value)


def bins(x):
    """Frequencies of the spectrum of x, in Hz."""
    return np.fft.rfftfreq(x.shape[-1], 1 / SR)


def follow(rows):
    """The columns of a curve over time, sample by sample."""
    s, *columns = np.transpose(rows)
    return [np.interp(np.arange(N) / SR, s, c) for c in columns]


def add(mix, s, sound):
    """Mix a sound in at s seconds, trimmed to fit."""
    skipped = max(-round(s * SR), 0)
    part = mix[:, max(round(s * SR), 0):][:, :sound.shape[-1] - skipped]
    part += sound[..., skipped:skipped + part.shape[-1]]


def balance(x):
    """Tilt the level between left and right by frequency."""
    return irfft(rfft(x) * amp(np.array([[.5], [-.5]]) * read(BALANCE, bins(x))), N)


def scene(room_db=-15, whisk_room_db=-16):
    """Whisk and spoon, their reflections, and the background."""
    beaten = balance(whisk() + grinds() + ticks() + sauce())
    spooned = balance(spoon_drag() + spoon_knocks())
    room = kitchen(amp(whisk_room_db) * beaten + amp(room_db) * spooned)
    return beaten + spooned + room + background()


def record(dry):
    """Low-pass at EDGE_HZ with a linear-phase filter."""
    lowpass = signal.firwin(511, EDGE_HZ, window=("kaiser", 9), fs=SR)
    return signal.oaconvolve(dry, lowpass[None], "same")


dry = scene()
out = record(dry)
to_wav(out)
```